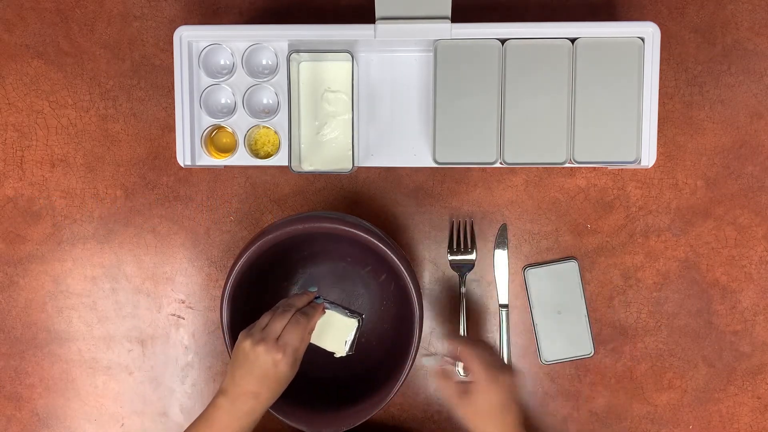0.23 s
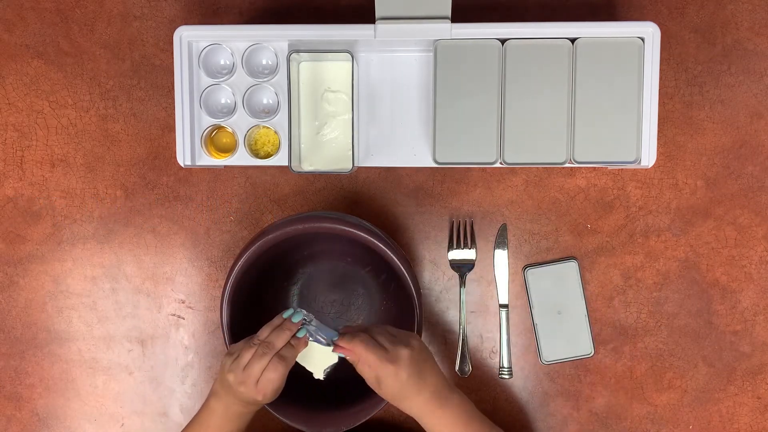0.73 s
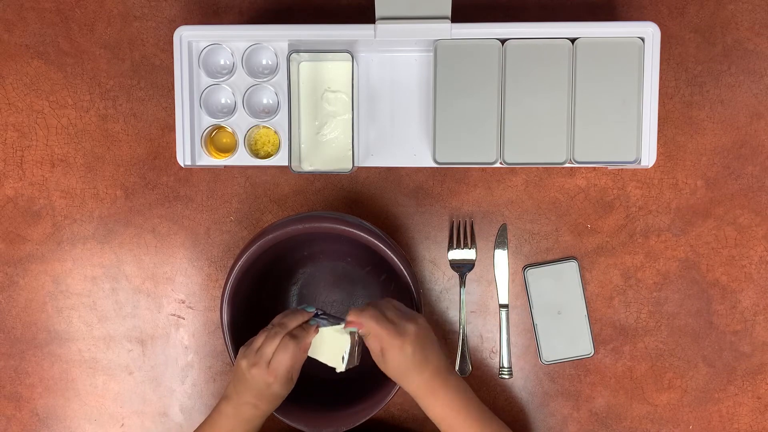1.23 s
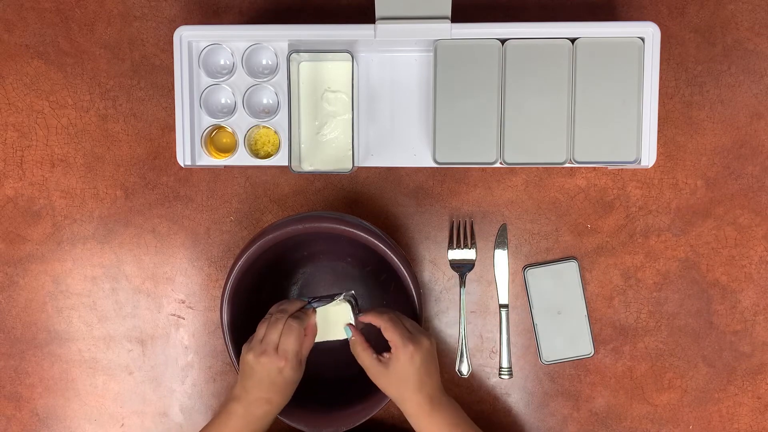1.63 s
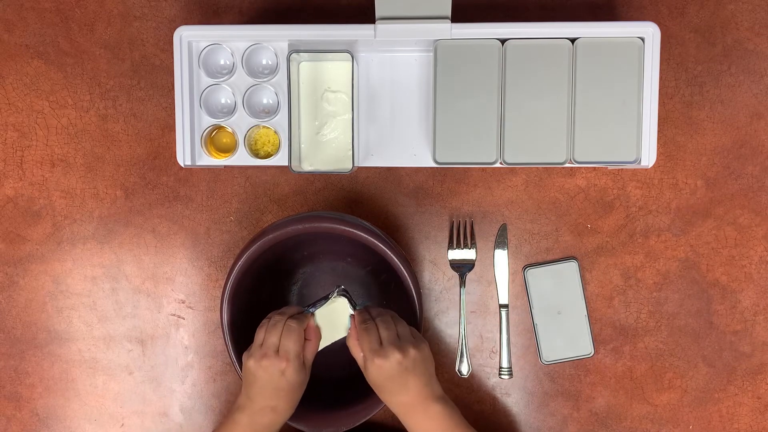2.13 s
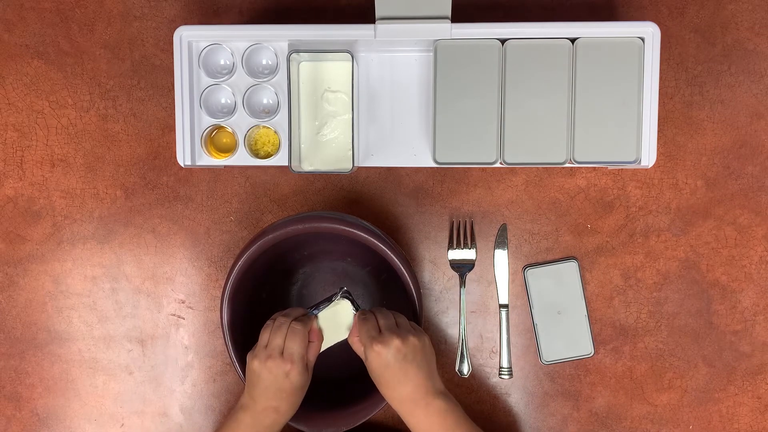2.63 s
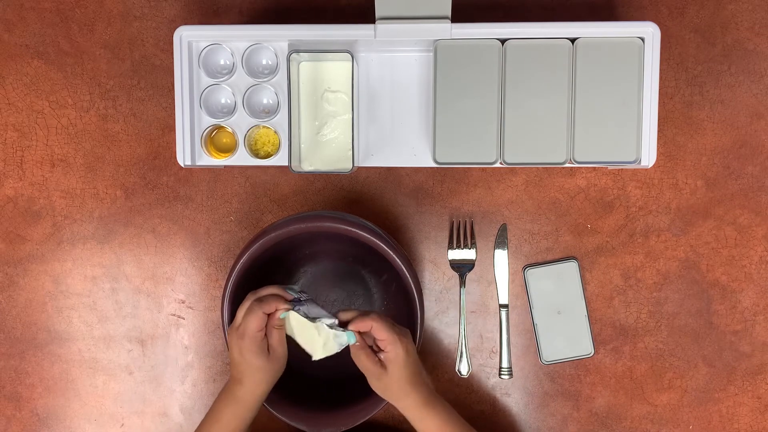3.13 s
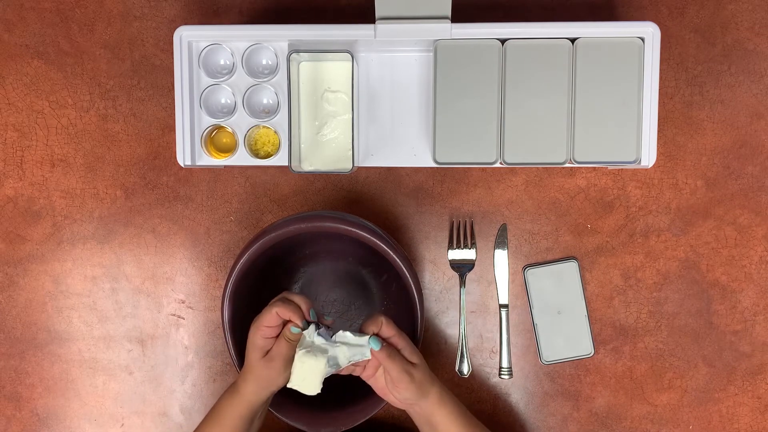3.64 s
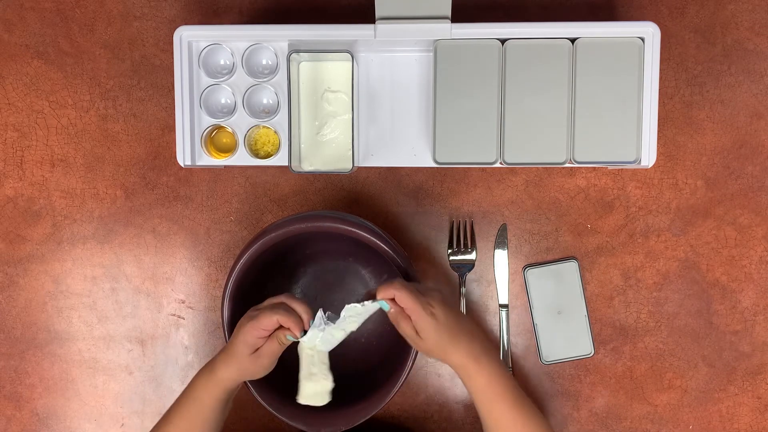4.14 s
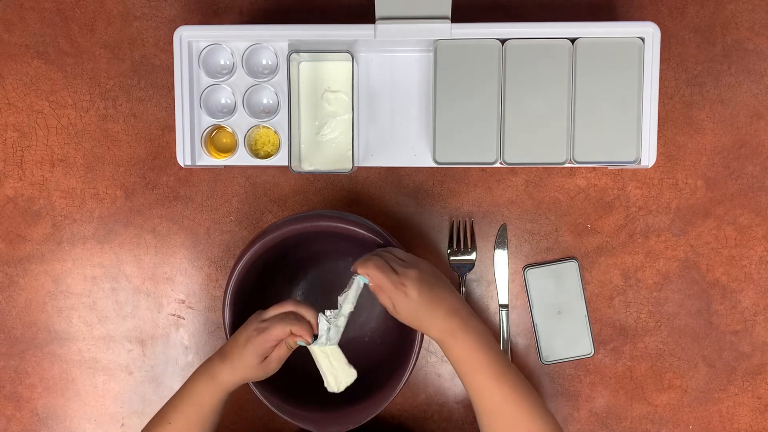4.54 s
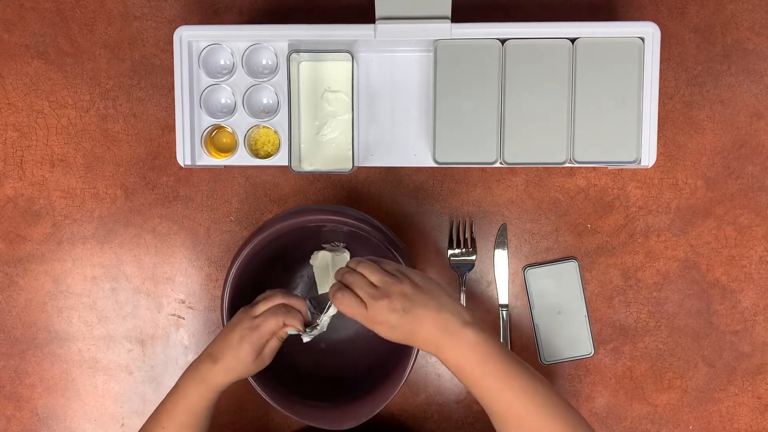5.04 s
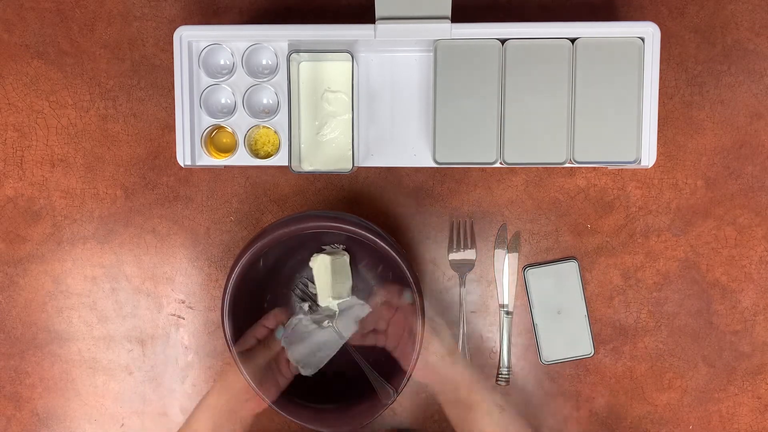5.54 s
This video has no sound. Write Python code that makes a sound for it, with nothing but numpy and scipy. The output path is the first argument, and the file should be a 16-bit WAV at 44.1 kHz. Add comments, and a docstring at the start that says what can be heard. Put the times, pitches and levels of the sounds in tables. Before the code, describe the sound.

Foil crinkles and snaps in small bursts as it is peeled by hand, over a low surging appliance rumble, with dull bowl bumps late.

```python
"""A plastic lid slides on the table while a kitchen appliance hums, rumbles and rushes, and goes on throughout.
This background swells slowly and its level dips briefly. Then two hands peel the foil off a block of butter
over a bowl: each tug makes filtered random clicks crackle and fizz, and creases snap one by one as short pulses.
The opened sheet rings in narrow resonances when stretched. Late on, butter and fingers bump the bowl,
heard as dull slaps over decaying modes, and a low wavering drone swells."""
import sys
import numpy as np
from scipy import signal
from scipy.fft import rfft, irfft
from scipy.io import wavfile
from scipy.ndimage import uniform_filter1d

SR = 44100
rng = np.random.default_rng(int(sys.argv[2]) if len(sys.argv) > 2 else 0)


def int16_out(signal):
    """Quantize to a 16-bit WAV file."""
    q = np.round(np.clip(np.atleast_2d(signal).T, -1, 1) * 32767)
    wavfile.write(sys.argv[1], SR, q.astype(np.int16))


N = 254456
TIME = np.arange(N) / SR  # s
BINS = np.fft.rfftfreq(N, 1 / SR)  # Hz


def amp(db):
    """Decibels to gain."""
    return 10 ** (np.asarray(db) / 20)


def unit(x):
    """Scales to rms 1."""
    return x / np.sqrt(np.mean(x ** 2) + 1e-20)


def read(points, hz):
    """Interpolates a spectrum on a log-frequency axis."""
    f, value = np.transpose(points)
    return np.interp(np.log(hz + 1), np.log(f + 1), value)


def gains(rows):
    """One gain curve over time for each dB column of a table."""
    s, *columns = np.transpose(rows)
    return [amp(np.interp(TIME, s, c)) for c in columns]


def colour(x, spectrum):
    """Filters by a dB spectrum, then scales to rms 1."""
    return unit(irfft(rfft(x) * amp(read(spectrum, BINS)), N))


def drift(hz):
    """Slow random curve, low-passed near a rate, rms 1."""
    return unit(irfft(rfft(rng.standard_normal(N)) / (1 + (BINS / hz) ** 4), N))


def add(mix, s, sound):
    """Adds a two-channel sound at a time."""
    part = mix[:, max(round(s * SR), 0):][:, :sound.shape[1]]
    part += sound[:, :part.shape[1]]


def resonate(x, modes):
    """The sound itself plus the narrow resonances that it excites."""
    answer = sum(amp(db) / (1 + 2j * (BINS - hz) / width) for hz, width, db in modes)
    return irfft(rfft(x) * (1 + answer), N)


def grains(per_s, spread_db, ring_s):
    """Many tiny buckles or slips of uneven size, each a click with a very short ring."""
    happens = rng.random(N) < per_s / SR
    size = amp(spread_db * np.minimum(rng.exponential(1, N), 4)) * happens
    kind = rng.integers(0, 12, size=N)
    t = np.arange(512) / SR
    bursts = rng.standard_normal((12, 2, len(t))) * np.exp(-t / ring_s)
    # the click carries about half the energy
    bursts[..., 0] = np.sign(bursts[..., 0]) * np.linalg.norm(bursts, axis=2)
    return sum(signal.oaconvolve((size * (kind == k))[None], burst, axes=1)[:, :N]
               for k, burst in enumerate(bursts))


def dips():
    """Brief bell-shaped dips in the background level, summed in dB."""
    # centre_s, depth_db, half_width_s (to 1/e)
    dip_rows = [(0.162, 8, 0.032), (0.252, 8.5, 0.017), (0.514, 10, 0.013), (0.573, 11, 0.019),
                (1.045, 4.5, 0.015), (1.192, 10, 0.0063), (1.345, 8.5, 0.051), (1.675, 14.5, 0.035),
                (2.95, 3.5, 0.018), (3.226, 12, 0.033), (3.329, 7, 0.013), (3.628, 9, 0.05),
                (3.813, 5.5, 0.027), (3.988, 9, 0.042), (4.194, 8, 0.0042), (4.286, 10, 0.037),
                (4.485, 10, 0.012), (4.563, 7.5, 0.023), (4.661, 15, 0.016)]
    return -sum(db * np.exp(-((TIME - s) / width) ** 2) for s, db, width in dip_rows)


def appliance(hum_db=-1, rumble_db=0, air_db=-12.0):
    """A mains-driven motor: hum, cabinet rumble with steady tones, and fluttering air, dipping together."""
    # slow swell before the layer gains: time_s, hum_db, rumble_db
    swell = [(0, -29, -31.5), (.1, -48, -21.5), (.33, -52, -29), (.46, -22.5, -23.5), (.8, -20.5, -23.5),
             (1.3, -33, -26.5), (1.6, -36, -27.5), (1.95, -22.5, -24), (2.25, -15, -21.5),
             (2.56, -27.5, -23), (2.66, -29.5, -27.5), (2.86, -33, -25), (3.15, -44, -30),
             (3.44, -11.5, -21.5), (3.76, -13.5, -19.5), (4.1, -25, -25.5), (4.7, -29.5, -23),
             (5.03, -15, -21.5), (5.32, -18.5, -20.5), (5.46, -40, -23.5), (5.77, -32, -26)]
    # cabinet rumble spectrum: freq_hz, level_db
    rumble_spectrum = [(20, -45), (40, -3), (52, 1), (75, 4), (100, -1), (125, -3), (150, -6), (195, -14.5),
                       (250, -13.5), (300, -16), (380, -11.5), (470, -24.5), (700, -30.5), (1500, -64.5)]
    # air rush spectrum: freq_hz, level_db
    air_spectrum = [(200, 7.5), (450, 7.5), (620, 7), (750, 4.5), (1100, 2), (1500, -3.5), (2000, -14.5),
                    (3000, -23), (4500, -29.5), (8000, -31.5), (11400, -30), (15500, -47)]
    # tones: freq_hz, level_db (against the rumble)
    whine_rows = [(242, -21.5), (387, -20.5), (829, -23.5), (947.5, -26.5), (1240, -33)]
    hum_hz, hum_wander_rad, hum_wander_hz = 58.48, 0.28, 5.6
    hum_dip, air_dip = 3.0, 0.81  # dip depths in dB as multiples of the rumble's
    # the hum wavers against the rumble and air
    hum_waver_db, rumble_waver_db, air_waver_db, waver_hz = -1.6, 1.58, 1.14, 11
    flutter_db, flutter_hz = 2.0, 40
    whine_stray, whine_stray_hz, whine_phase_hz = 0.53, 19.5, 3.9

    hum_gain, swell_gain = gains(swell)
    dip_db, waver = dips(), drift(waver_hz)
    hum_gain = hum_gain * amp(hum_dip * dip_db + hum_waver_db * waver)
    flutter = flutter_db * drift(flutter_hz)
    air_gain = swell_gain * amp(air_dip * dip_db + air_waver_db * waver + flutter)
    rumble_gain = swell_gain * amp(dip_db + rumble_waver_db * waver)

    hum = np.sqrt(2) * np.sin(2 * np.pi * hum_hz * TIME + hum_wander_rad * drift(hum_wander_hz))
    whines = 0
    for hz, db in whine_rows:
        tone = np.sqrt(2) * np.sin(2 * np.pi * hz * TIME + drift(whine_phase_hz))
        whines = whines + amp(db) * tone * (1 + whine_stray * drift(whine_stray_hz))
    body = colour(rng.standard_normal((2, N)), rumble_spectrum)
    # the drive is even from moment to moment
    body = body / np.sqrt(uniform_filter1d(body ** 2, size=3500, axis=1))
    rush = colour(rng.standard_normal((2, N)), air_spectrum)
    return (amp(hum_db) * hum_gain * hum
            + amp(rumble_db) * rumble_gain * (body + whines)
            + amp(air_db) * air_gain * rush)


def boom():
    """Filtered noise: the upper bass of the rumble swells now and then."""
    # time_s, level_db
    boom_level = [(0, -53), (.1, -28.5), (.25, -46), (.46, -30.5), (.9, -50), (1.6, -37.5), (1.85, -39),
                  (2.25, -25.5), (2.43, -31.5), (2.55, -23.5), (2.68, -32.5), (3.3, -49), (3.5, -34),
                  (3.88, -26), (4.02, -39), (4.85, -41), (5, -26.5), (5.2, -28), (5.4, -40.5)]
    # spectrum: freq_hz, level_db
    boom_spectrum = [(70, -33), (115, 1), (160, 0.5), (200, -6), (280, -7), (350, -19), (600, -62)]
    return gains(boom_level)[0] * amp(dips()) * colour(rng.standard_normal((2, N)), boom_spectrum)


def hiss(level_db=-68):
    """Faint steady hiss of the microphone: filtered noise."""
    # spectrum: freq_hz, level_db
    hiss_spectrum = [(1000, -2), (3000, -15), (8000, -9), (11500, -12), (15500, -11)]
    return amp(level_db) * colour(rng.standard_normal((2, N)), hiss_spectrum)


def lid(level_db=-2):
    """Dense little slips of a plastic lid on the table top make the lid ring."""
    # slide, before level_db: time_s, level_db
    slide_level = [(0, -21), (.04, -23), (.08, -25), (.11, -29), (.14, -50), (.22, -56), (.28, -59)]
    # slip spectrum: freq_hz, level_db
    lid_spectrum = [(300, -14), (550, -7), (790, -1.5), (1000, -9), (1480, 0.5), (1900, -8.5), (2400, -8.5),
                    (3300, -13.5), (4500, -13), (6200, -15), (8000, -18), (10000, -17), (13000, -26.5),
                    (15800, -28)]
    # lid resonances: freq_hz, width_hz, level_db
    lid_modes = [(1300, 28, -25), (1520, 58, -18), (2260, 105, 1), (2970, 30, -10), (3230, 49, 2)]
    slips = colour(grains(per_s=1300, spread_db=2, ring_s=0.0025), lid_spectrum)
    return amp(level_db) * resonate(gains(slide_level)[0] * slips, lid_modes)


def tug_envelope(start, length):
    """A swell, a hold while the fingers pull, then a fade as the sheet settles."""
    rise_db_per_s, fade_db_per_s = 533, 324
    age = TIME - start
    rise_db = np.minimum(rise_db_per_s * age, 0)
    return amp(rise_db - fade_db_per_s * np.maximum(age - length, 0))


def rustle(crackle_db=-2, fizz_db=-2):
    """With each tug the sheet crackles as it flexes and fizzes as it comes off the butter."""
    # tugs, before the layer gains: hold_start_s, hold_length_s, crackle_db, fizz_db
    tug_rows = [(0.44, 0.017, -61, -63), (0.62, .03, -67, -59), (0.71, 0.048, -62, -51),
                (.85, 0.035, -60, -57), (1.09, 0.044, -48.5, -63), (1.245, 0.014, -65, -55),
                (2.927, 0.073, -49, -57.5), (3.12, 0.013, -50, -71), (3.296, 0.054, -38, -31),
                (3.375, 0.11, -41.5, -49.5), (3.51, 0.078, -46.5, -52), (3.625, 0.15, -42.5, -59),
                (3.827, 0.053, -33.5, -52), (4.116, 0.01, -40, -53), (4.396, 0.0069, -32, -43.5),
                (4.534, 0.011, -38.5, -70), (4.604, 0.013, -43, -56), (4.74, 0.044, -36.5, -55),
                (4.797, 0.036, -30, -66), (4.916, 0.077, -26, -44.5), (4.982, 0.081, -40.5, -79),
                (5.128, 0.065, -28.5, -62), (5.307, 0.052, -44, -55), (5.476, 0.015, -52, -59),
                (5.634, 0.017, -49.5, -74), (5.749, 0.024, -36, -49)]
    # crackle spectrum: freq_hz, level_db
    crackle_spectrum = [(500, 2), (1100, -16.5), (1600, 0), (2400, -0.5), (3200, 1.5), (4300, -1.5),
                        (5300, -3), (6800, -11), (8000, -26), (10500, -24.5), (15000, -26)]
    # fizz spectrum: freq_hz, level_db
    fizz_spectrum = [(2000, -13.5), (6000, -37), (8000, 0), (10000, 3), (12500, -9), (15500, -59)]
    flex, peel = np.zeros((2, N))
    for start, length, flex_db, peel_db in tug_rows:
        pull = tug_envelope(start, length)
        flex = np.maximum(flex, amp(flex_db) * pull)
        peel = np.maximum(peel, amp(peel_db) * pull)
    crackle = colour(grains(per_s=700, spread_db=3.7, ring_s=.0012), crackle_spectrum)
    fizz = colour(grains(per_s=1400, spread_db=3, ring_s=.0009), fizz_spectrum)
    return amp(crackle_db) * flex * crackle + amp(fizz_db) * peel * fizz


def crumple(level_db=0):
    """Foil pressed against the soft butter folds in a dense, dull crinkle."""
    # finger presses: hold_start_s, hold_length_s, level_db
    press_rows = [(0.45, 0.013, -48.5), (0.708, 0.28, -46), (1, 0.16, -44), (2.966, 0.071, -49.5),
                  (3.397, 0.18, -39), (3.683, 0.082, -37.5), (3.868, 0.028, -37), (4.344, 0.038, -47.5),
                  (4.504, .012, -45), (5.133, 0.06, -33), (5.286, 0.13, -45)]
    # crinkle spectrum: freq_hz, level_db
    crumple_spectrum = [(500, 2.5), (1000, 0), (1500, 5.5), (2100, -6.5), (3100, -18), (4500, -18),
                        (9000, -33), (15000, -48.5)]
    press = np.max([amp(db) * tug_envelope(start, length) for start, length, db in press_rows], axis=0)
    folds = grains(per_s=850, spread_db=3.3, ring_s=.0015)
    return amp(level_db) * press * colour(folds, crumple_spectrum)


def avalanche(t, ring_s, rise_s, after_db=-13, count=4):
    """A crease flips with one crack and sets off a few smaller ones just after."""
    delay, size = rng.exponential(1, (2, count))
    age = np.maximum(t - np.append(0, .002 * delay)[:, None], 0)
    sizes = np.append(1, amp(after_db) * np.minimum(size, 2))[:, None]
    cracks = sizes * (1 - np.exp(-age / rise_s)) * np.exp(-age / ring_s)
    return np.linalg.norm(cracks, axis=0)


def crack(gain):
    """Minimum-phase pulse spectrum of a given gain: energy comes as early as possible and rings out."""
    cepstrum = irfft(np.log(np.maximum(gain / gain.max(), 1e-4)))
    half = len(cepstrum) // 2
    fold = np.r_[1, np.full(half - 1, 2), 1, np.zeros(half - 1)]
    return np.exp(rfft(cepstrum * fold))


def bounces(hz):
    """A pulse and its first echoes off the bowl and the table; the echo delays vary a little by chance from
    snap to snap."""
    # echoes: nominal_delay_s, level_db
    echo_rows = [(.0007, -7.5), (.0014, -5.5), (.0022, 2)]
    scatter = 0.1186  # spread of the log delay
    delay, db = np.transpose(echo_rows)
    delay = delay * np.exp(scatter * rng.standard_normal(len(delay)))
    turn = rng.random((2, len(delay), 1))
    echoes = amp(db)[:, None] * np.exp(2j * np.pi * (turn - delay[:, None] * hz))
    return 1 + echoes.sum(axis=1)


def taut_sheet(x):
    """Each snap sets the opened sheet ringing while stretched, and lower once it goes slack."""
    # sheet resonances: start_s, end_s, freq_hz, width_hz, level_db
    taut_rows = [(4.755, 4.933, 3230, 75, 9.5), (4.755, 4.955, 7000, 130, 6.5),
                 (4.935, 5.06, 2930, 90, 1.5), (4.93, 5.06, 1740, 90, 5)]
    out = x
    for start, end, *mode in taut_rows:
        held = x * ((TIME > start) & (TIME < end))
        out = out - held + resonate(held, [mode])
    return out


def snaps(rise_s=0.00071, rattle_s=0.0081, rattle_db=-21, strain_s=0.0092, strain_db=-24):
    """Each facet creaks, flips with a crack, rings and shakes the sheet; gives direct sound and room feed."""
    # snapping creases, plus one dull knock on the bowl (the 440 Hz row at 4.3961 s): time_s, level_db,
    # pitch_hz, spread_octaves, room_share_db, ring_s
    snap_rows = [(0.48, -43, 9370, .7, -14, .0015), (0.7223, -47, 7300, 0.9, 9, .003),
                 (0.753, -45, 9000, 0.55, 1, .003), (1.244, -50.5, 7400, 0.72, 3, .003),
                 (2.4505, -48, 14000, 0.57, -7, .0015), (2.763, -47.5, 6940, 1.5, 0, .002),
                 (2.814, -52, 12000, .7, -8, .001), (2.865, -54, 11000, 0.6, -8, .001),
                 (2.922, -24.5, 3300, 0.59, -3.5, 0.0014), (2.9854, -42, 3580, 0.53, 0, .002),
                 (3.107, -57, 5000, .7, -11, .002), (3.1227, -41.5, 4200, 0.75, 5.5, 0.0014),
                 (3.275, -28, 8560, 0.54, 2, 0.0014), (3.3028, -23, 6900, 2.4, 7, 0.0045),
                 (3.311, -19.5, 10500, 0.27, 3, 0.0017), (3.4543, -38, 1890, 0.78, 9, 0.0015),
                 (3.4774, -37, 14700, 0.68, -8, .0008), (3.523, -29, 14700, 0.37, -2, .0008),
                 (3.56, -39, 1500, 0.19, -12, .002), (3.5808, -29, 14700, 0.51, -9, .0008),
                 (3.624, -39, 8000, 0.61, -6, .001), (3.6364, -32.5, 4500, 0.38, 5.5, 0.0019),
                 (3.6663, -25, 2500, 0.93, 2, .0015), (3.691, -36, 2100, 0.43, 8, .0015),
                 (3.7133, -38.5, 4800, 0.43, 0, .001), (3.73, -40, 1700, 0.4, 6, .002),
                 (3.772, -31, 1560, 0.16, -1, .002), (3.79, -34, 1700, 0.2, -13, .002),
                 (3.8303, -25.5, 3780, 2.4, 2.5, 0.0025), (3.847, -28, 2960, 0.63, -6, 0.0015),
                 (3.898, -31.5, 2720, 0.43, -19, 0.0018), (4.05, -54, 11000, .7, -8, .001),
                 (4.1244, -20, 5500, 3.9, -7, 0.00099), (4.132, -27, 8040, 0.18, -7, 0.0033),
                 (4.193, -43, 3600, 0.14, -1, 0.0035), (4.342, -45.5, 5040, 2.8, 3, 0.0011),
                 (4.3959, -23.5, 1920, 0.35, -7, 0.005), (4.3961, -24, 440, 0.68, -16, .006),
                 (4.406, -25.5, 1970, 0.85, -8, 0.0034), (4.4075, -40, 12000, .6, -9, .002),
                 (4.419, -44, 2270, 0.48, -11, 0.0016), (4.457, -34.5, 1720, 1.9, -4, 0.0036),
                 (4.5315, -24.5, 5800, 2.6, -20, 0.0012), (4.539, -30.5, 5500, 1.6, -19, 0.00092),
                 (4.6265, -32.5, 2150, 0.49, -5, 0.0018), (4.6339, -31, 3170, 0.3, -12, 0.00063),
                 (4.703, -44.5, 4000, 2, 5, .0015), (4.734, -44, 13000, 0.88, -6, .001),
                 (4.7635, -32.5, 3040, 0.4, 0, .002), (4.773, -41, 2960, 0.84, 2, .002),
                 (4.7822, -26.5, 2790, 1.1, 2, 0.0018), (4.7949, -23.5, 3880, 1.2, -1, .0012),
                 (4.8048, -22, 2380, 0.82, -11, 0.0019), (4.8148, -27, 1500, 0.91, -1, 0.001),
                 (4.8208, -21, 2350, 1.1, -12, 0.0015), (4.8246, -25, 1500, 0.79, -5, 0.0011),
                 (4.867, -26.5, 3200, 0.85, 3, .0012), (4.882, -13.5, 3740, 0.97, 0, 0.0015),
                 (4.906, -21, 4230, 1.3, 0, 0.00085), (4.913, -15, 4700, 1.1, -3, 0.00096),
                 (4.9301, -17, 4530, 1, 2, 0.0013), (4.939, -11.5, 2350, 0.21, -2, 0.0023),
                 (4.9666, -19, 2510, 0.87, -21, .0018), (4.976, -24.5, 2260, 0.49, 7, 0.0015),
                 (5.006, -27.5, 1200, 0.72, -14, .0015), (5.018, -28, 2380, 0.47, 4.5, 0.00086),
                 (5.1178, -15.5, 2130, 0.47, 0.5, 0.0037), (5.137, -20.5, 1200, .5, -7, .0015),
                 (5.154, -25, 5500, 0.23, -4, 0.0041), (5.163, -21.5, 2680, 0.59, -3, 0.0017),
                 (5.1919, -22.5, 1820, 0.38, -11, 0.0027), (5.2384, -28.5, 2230, 0.5, 1, 0.0016),
                 (5.2508, -26, 1850, 0.49, -6, 0.0027), (5.27, -39, 1400, 0.67, 0, .002),
                 (5.284, -37, 1700, .6, -5, .0015), (5.3, -36, 1900, 0.43, 5, .001),
                 (5.31, -34, 1300, 0.74, 6.5, .002), (5.326, -32.5, 2710, 0.36, 0, 0.0014),
                 (5.351, -36, 2250, 0.48, 5, .0015), (5.3695, -31, 1900, 0.61, -5, .002),
                 (5.486, -30, 2580, 0.61, 0, 0.0037)]
    # foil spectrum: freq_hz, level_db
    sheet_spectrum = [(700, 13.5), (1200, 9.5), (2000, 1), (3200, 5.5), (4000, 0.5), (4800, 7.5),
                      (6000, 3.5), (7100, 2.5), (8000, 4.5), (11000, 1.5), (13000, -1), (16000, 3.5)]
    lead_s, ring_db = .02, -4  # ring against the crack
    low_hz, reach = 700, 2.85  # bass corner; treble corner as a multiple of pitch
    direct, feed = np.zeros((2, 2, N))
    t = np.arange(4096) / SR - lead_s
    hz = np.fft.rfftfreq(4096, 1 / SR) + 1
    age = np.maximum(t, 0)
    strain = amp(strain_db) * np.exp(-abs(t) / strain_s)
    for s, db, pitch, spread, room_db, ring_s in snap_rows:
        rattle = amp(rattle_db) * (1 - np.exp(-age / ring_s)) * np.exp(-age / rattle_s)
        shape = strain + avalanche(age, ring_s, rise_s) + rattle
        shape /= np.linalg.norm(shape[(t >= 0) & (t < .005)])
        facet = amp(read(sheet_spectrum, hz)) / (1 + (np.log2(hz / pitch) / spread) ** 2)
        facet /= np.sqrt(1 + (low_hz / hz) ** 4)  # a small sheet radiates no bass
        facet /= np.sqrt(1 + (hz / (reach * pitch)) ** 10)  # treble falls off steeply above reach * pitch
        ring = irfft(facet * np.exp(2j * np.pi * rng.random((2, len(hz))))) * shape
        pulse = np.roll(irfft(crack(facet) * bounces(hz)), round(lead_s * SR), axis=1)
        snap = unit(pulse) + amp(ring_db) * np.linalg.norm(shape) * unit(ring)
        # level refers to the shape's first 5 ms
        target = amp(db) * np.sqrt(.005 * SR) * np.linalg.norm(shape)
        snap *= target / np.linalg.norm(snap, axis=1, keepdims=True)
        add(direct, s - lead_s, snap)
        add(feed, s - lead_s, snap * amp(room_db))
    return taut_sheet(direct), taut_sheet(feed)


def bowl(contact_s=0.0004, ring_db=-10, thud_db=-3.0, thud_s=0.031):
    """Butter and fingers bump the bowl: a dull slap pitched by the contact, and the bowl's low modes."""
    # soft blows: time_s, level_db, slap_pitch_hz
    blow_rows = [(4.395, -28, 520), (4.972, -22.5, 356), (5.002, -16.5, 348), (5.118, -11.5, 570),
                 (5.149, -21, 700), (5.164, -17, 480), (5.19, -19.5, 610), (5.25, -31, 540),
                 (5.288, -23.5, 570), (5.315, -21.5, 580)]
    # bowl modes, before ring_db: freq_hz, level_db, t60_s
    bowl_modes = [(316, 2.5, 0.082), (349, -1.5, 0.37), (445, 6.5, 0.12), (540, 3, 0.14), (594.5, 6, 0.26),
                  (672, 2.5, 0.12), (840, -14, 0.13), (1250, -19, .15)]
    # slap spectrum: multiple_of_slap_pitch, level_db
    thud_spectrum = [(.2, -45), (.47, -29), (.7, -1), (1, 21), (1.3, 4), (1.7, -6), (2.5, -14), (4.2, -50)]
    out = np.zeros((2, N))
    t = np.arange(SR) / SR
    hz = np.fft.rfftfreq(SR, 1 / SR)
    fade = np.exp(-t / thud_s)
    for s, db, pitch in blow_rows:
        ring = sum(amp(mode_db - 60 * t / t60) * np.sin(2 * np.pi * (f * t + rng.random((2, 1))))
                   for f, mode_db, t60 in bowl_modes)
        gain = amp(read(np.multiply(thud_spectrum, [pitch, 1]), hz))
        slap = irfft(gain * np.exp(2j * np.pi * rng.random((2, len(hz)))), SR) * fade
        slap *= np.linalg.norm(fade) / np.linalg.norm(slap, axis=1, keepdims=True)
        blow = amp(ring_db) * ring + amp(thud_db) * slap
        add(out, s, amp(db) * blow * (1 - np.exp(-t / contact_s)))
    return out


def drone(wander_rad=0.8, wander_hz=3.2, waver=0.55, waver_hz=13):
    """One low tone, swelling once the butter has landed, that wavers in pitch and level."""
    # time_s, level_db
    drone_level = [(5.12, -74), (5.31, -23), (5.45, -30), (5.77, -30.5)]
    drone_hz = 162
    tone = np.sqrt(2) * np.sin(2 * np.pi * drone_hz * TIME + wander_rad * drift(wander_hz))
    return gains(drone_level)[0] * tone * unit(1 + waver * drift(waver_hz))


def kitchen(x, build_s=0.0019):
    """Reflections from table and walls: a decaying noise tail whose top treble dies first."""
    # room decay: freq_hz, t60_s
    room_decay = [(200, 0.14), (1000, 0.4), (3000, 0.26), (7000, 0.15), (15000, 0.11)]
    hz, t, z = signal.stft(rng.standard_normal((2, SR // 2)), SR, nperseg=256)
    decay = amp(-60 * t / read(room_decay, hz)[:, None])
    tail = signal.istft(z * decay, SR, nperseg=256)[1]
    tail *= 1 - np.exp(-np.arange(tail.shape[1]) / SR / build_s)
    return signal.fftconvolve(x, tail / np.linalg.norm(tail[0]), axes=1)[:, :N]


def widen(x, tilt, likeness):
    """Stereo widening: sum and difference take turns along the frequency axis."""
    # phase by which the left leads: freq_hz, lead_rad
    lead_rows = [(0, 0), (120, .2), (300, .9), (600, 1.8), (1000, 1.25), (1700, 1.1), (2500, 1.55),
                 (3500, 1.25), (4000, 1.7), (4600, 2.85), (5100, 3.4), (6200, 5.9), (7200, 6.7),
                 (8700, 9.1), (9300, 9.7), (10700, 12.3), (11700, 12.9), (12800, 15.4), (13800, 16),
                 (14700, 18.6), (16500, 19)]
    a, b = rfft(x)
    half = np.interp(BINS, *np.transpose(lead_rows)) / 2
    c = np.clip(likeness, 0, 1)
    mid = np.cos(half) * a
    side = 1j * np.sin(half) * (c * a + np.sqrt(1 - c ** 2) * b)
    lean = amp(read(tilt, BINS) / 2)
    return irfft(np.array([(mid + side) * lean, (mid - side) / lean]), N)


def scene(snap_db=0, room_db=-5):
    """Foil, lid and bowl in the kitchen, over the appliance."""
    # hollow of the bowl ringing under the foil: freq_hz, width_hz, level_db
    hollow_modes = [(1150, 25, 9), (1690, 24, -14), (1802, 55, 1.5), (2040, 34, 0), (2220, 13, -4),
                    (2412, 11, -17), (2830, 10, -8), (3320, 150, -11)]
    # hands' stereo tilt: freq_hz, left_minus_right_db
    foil_tilt = [(150, -7), (400, -6), (700, -3), (1200, -1.5), (2500, -1), (15000, -1)]
    # background's stereo tilt: freq_hz, left_minus_right_db
    background_tilt = [(60, -3.5), (125, -8.5), (250, -9), (390, -11), (700, -5.5), (1300, -6.5),
                       (2400, -6), (15000, -8)]
    direct, feed = snaps()
    rub, knocks, slide = rustle() + crumple(), bowl(), lid()
    soft_feed = amp(-7) * rub + amp(-14) * knocks + amp(-10) * slide
    reflections = kitchen(amp(room_db) * feed + soft_feed)
    hands = resonate(amp(snap_db) * direct + reflections, hollow_modes) + rub + knocks + slide
    background = appliance() + boom() + drone() + hiss()
    return (widen(hands, foil_tilt, likeness=0.65)
            + widen(background, background_tilt, likeness=0.55))


def record(dry):
    """Full-scale limit, then a low-pass band limit."""
    edge_hz = 15950
    low_pass = signal.firwin(401, edge_hz, window=("kaiser", 9), fs=SR)
    return signal.oaconvolve(np.clip(dry, -1, 1), low_pass[None], "same")


dry = scene()
out = record(dry)
int16_out(out)
```